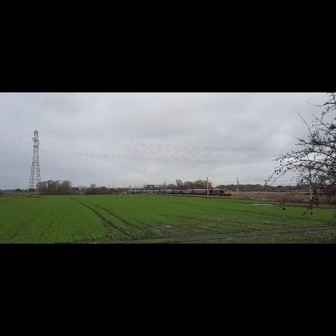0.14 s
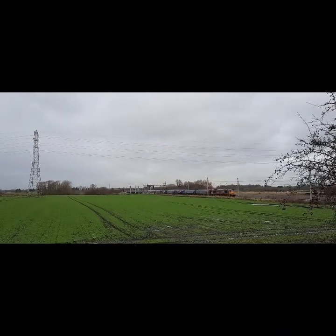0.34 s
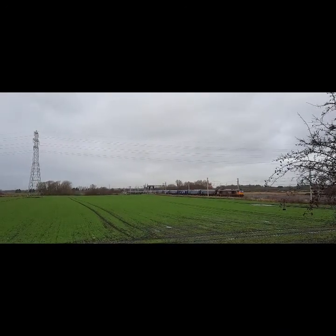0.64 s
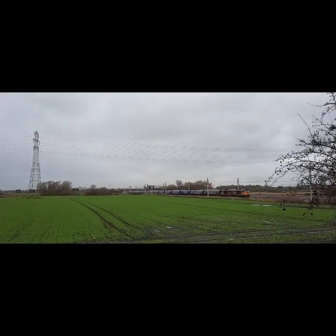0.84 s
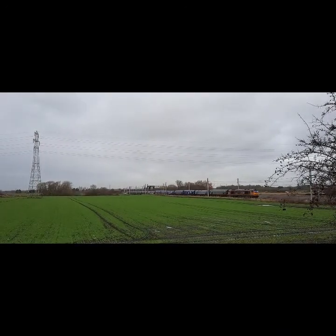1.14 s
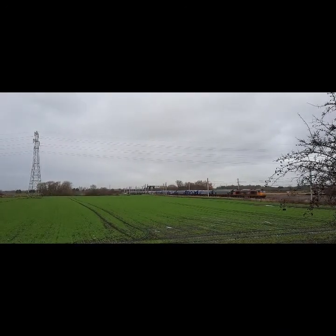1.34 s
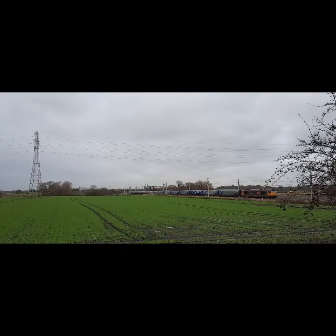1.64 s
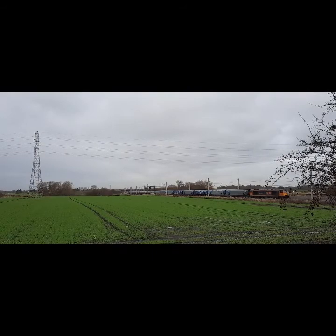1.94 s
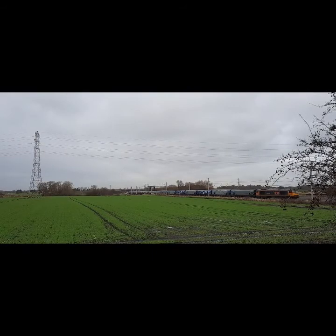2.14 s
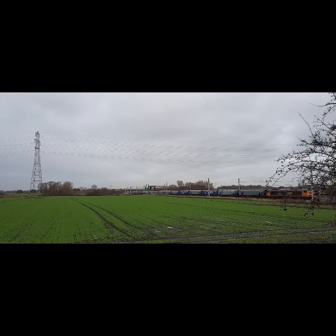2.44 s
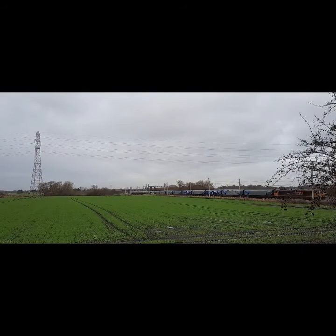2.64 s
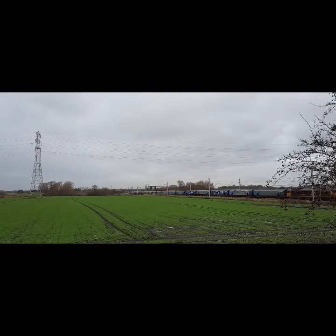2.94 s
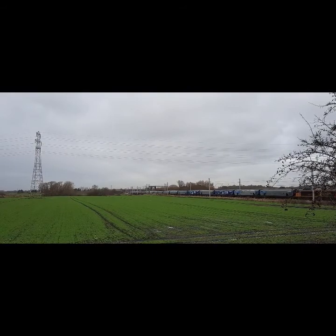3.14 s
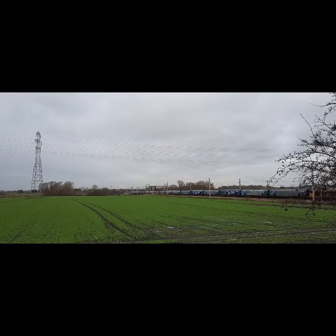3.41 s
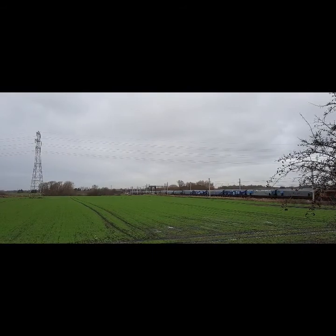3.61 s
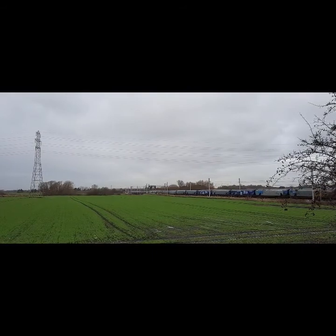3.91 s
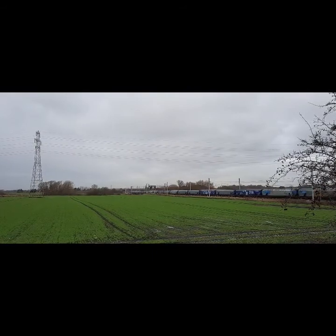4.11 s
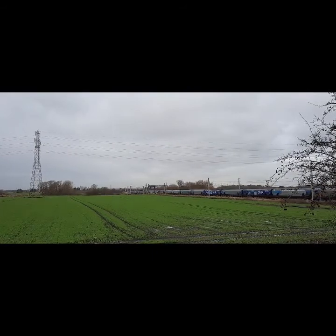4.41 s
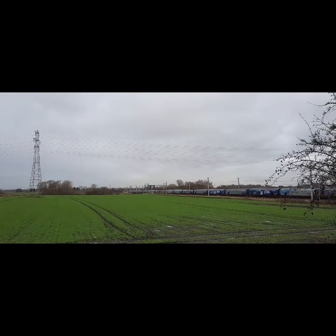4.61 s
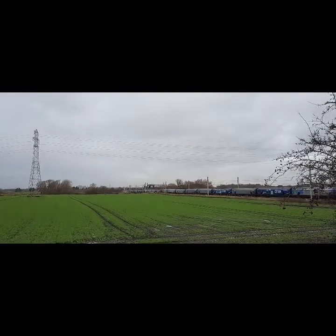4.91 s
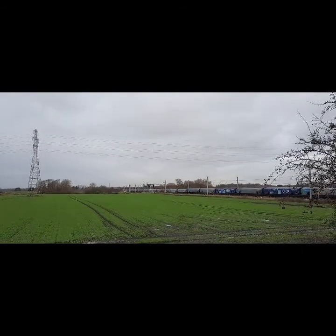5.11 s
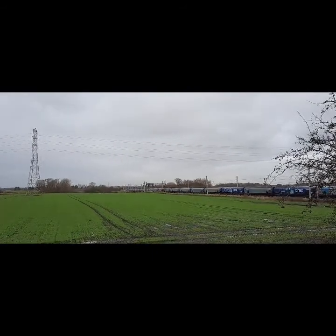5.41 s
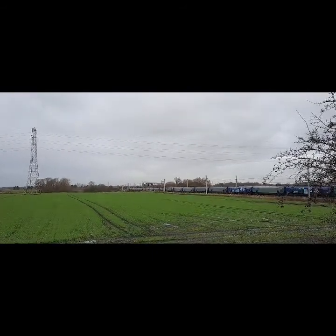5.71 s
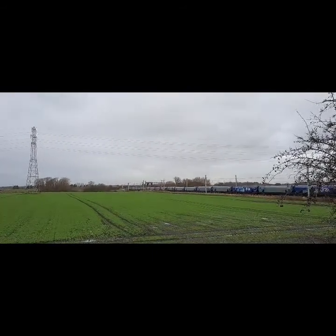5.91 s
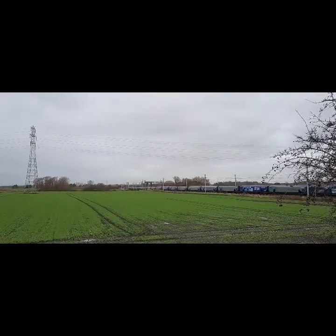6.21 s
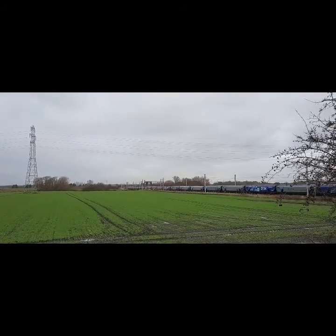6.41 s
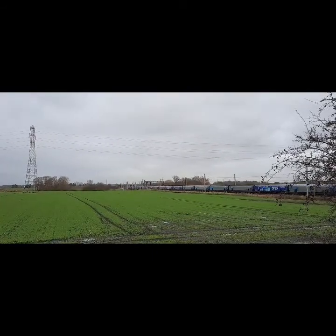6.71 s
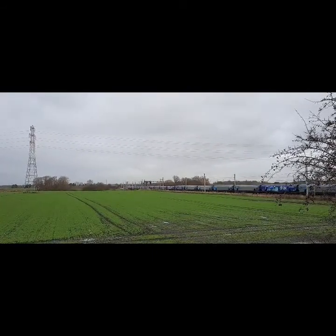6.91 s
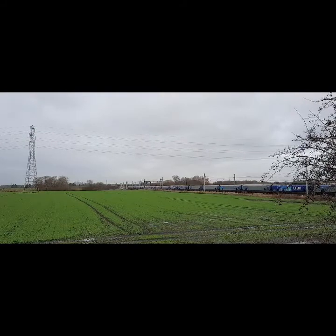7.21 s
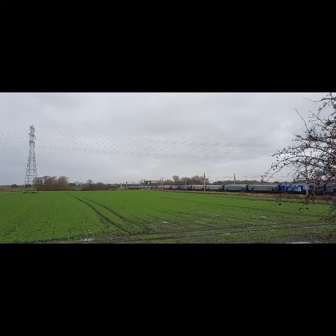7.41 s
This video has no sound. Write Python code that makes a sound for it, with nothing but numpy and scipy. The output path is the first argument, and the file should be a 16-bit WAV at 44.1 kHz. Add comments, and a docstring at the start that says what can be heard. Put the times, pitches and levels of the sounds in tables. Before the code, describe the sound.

A diesel freight train passes at a moderate distance across an open field, heard by a fixed stereo microphone outdoors. From the start a deep engine boom throbs steadily about eight times a second over low rumble, with a mid-low hum and a wavering fan tone near 300 Hz. Wheel roar, rail ring and airy hiss swell together, strongest around 3 to 5.5 seconds. Faint metallic squeals near 1.9 kHz rise around 1 to 2.5 seconds; from about 4.2 to 6.3 seconds a thin wheel tone near 2.5 kHz sings unsteadily, leaning left, with a brief higher squeal near 4.6. The engine's pitch slides down slightly throughout. After 5.9 seconds engine and roar fall away, quietest around 6.85, with tiny dull coupling clanks at 6.4 to 6.8. Wagons roll on softly and the low throb recovers a little until the end at 7.5.

```python
"""Diesel freight train beyond a field

A two-stroke engine throbs about eight times a second and sinks in pitch by the Doppler shift: harmonics
of the shaft speed sum to its boom, hum and drone, and a wavering tone gives its cooler fans.
Shaped noise gives the rumble, wheel roar, rail ring and hiss; narrow resonances make wheels sing faintly,
and short bursts of narrow noise are coupling knocks. A two-port microphone sets the stereo image."""
import sys
import numpy as np
from scipy import signal
from scipy.fft import rfft, irfft
from scipy.io import wavfile
from scipy.ndimage import uniform_filter1d

SR = 44100
rng = np.random.default_rng(int(sys.argv[2]) if len(sys.argv) > 2 else 0)


def digitize_waveform(pressure):
    """Quantize a signal to 16-bit integers and store it at the path in sys.argv[1].

    Rows of a 2-D input are taken as channels; values are limited to [-1, 1].
    """
    field = np.atleast_2d(pressure).T
    bounded = np.clip(field, -1, 1)
    quanta = np.round(bounded * 32767).astype(np.int16)
    wavfile.write(sys.argv[1], SR, quanta)


N = 332955
TIME = np.arange(N) / SR  # s
WINDOW, HOP = 4096, 1024  # short-time spectra, samples
BINS = np.fft.rfftfreq(WINDOW, 1 / SR)  # Hz
FRAMES = np.arange(N // HOP + 3) * HOP / SR  # s

# nearness of the locomotive, which the rumble, rolling noises and steady fan tone follow in their own
# proportions: t/s, nearness/dB
NEARNESS = [(0, -8), (.8, -5.5), (2.3, -2), (3.8, 0.5), (5.5, -1), (6.3, -5.5), (6.85, -7.5), (7.55, -4.5)]


def gain_of(db):
    """Logarithmic level: 20 dB is a factor of ten in amplitude."""
    return 10 ** (np.asarray(db) / 20)


def evened(x):
    """Normalization: scales a signal to an rms of one."""
    return x / np.sqrt(np.mean(x ** 2) + 1e-20)


def curves(rows, t=TIME):
    """Linear interpolation in time of each column of a table."""
    s, *columns = np.transpose(rows)
    return [np.interp(t, s, column) for column in columns]


def spectra(rows):
    """Linear interpolation over log frequency of each column of a table."""
    hz, *columns = np.transpose(rows)
    return [np.interp(np.log(BINS + 1), np.log(hz + 1), column) for column in columns]


def bell(t, s, length):
    """Gaussian envelope of height one, centred on s with standard deviation length."""
    return np.exp(-((t - s) / length) ** 2 / 2)


def changeover(s, length, db):
    """Sigmoid transition: a smooth step of db around time s."""
    return db * (1 + np.tanh((TIME - s) / length)) / 2


def drift(rate):
    """Low-passed random process of rms one, changing about `rate` times a second."""
    hz = np.fft.rfftfreq(N, 1 / SR)
    lowpass = np.exp(-(hz / rate) ** 2)
    return evened(irfft(rfft(rng.standard_normal(N)) * lowpass, N))


def narrow(hz, width_hz):
    """Quadrature modulation: slow noise on two carriers makes a narrow band of noise at hz."""
    angle = 2 * np.pi * np.cumsum(hz * np.ones(N)) / SR
    return evened(drift(width_hz) * np.cos(angle) + drift(width_hz) * np.sin(angle))


def wavering(hz, wander_hz, rate):
    """Frequency modulation: a tone of rms one whose pitch wanders randomly about hz."""
    return np.sqrt(2) * np.cos(2 * np.pi * np.cumsum(hz + wander_hz * drift(rate)) / SR)


def panned(x, balance_db):
    """Level difference between the ports: the left is louder by balance_db."""
    gains = gain_of([[balance_db / 2], [-balance_db / 2]])
    return x * gains / gains.mean()


def ports():
    """Interaural-style cues: each port's gain and their complex coherence, by time and frequency."""
    # direction of the noise: t/s, share from the side (0-1), lag of the left port for sound ahead/ms
    bearing = [(0, 0, -0.013), (1.2, 0.15, -0.02), (2.4, 0.35, 0.066), (3.5, 0.67, 0.12), (4.6, 0.82, 0.28),
               (7.55, 0.87, 0.13)]
    # colour of the ports: f/Hz, then left level/dB and right level/dB for ahead, abreast and away
    port_gains = [(60, 4, -1, 4.5, -2.5, 2.5, -2), (248, 2, -0.5, 3.0, -0.5, 2.5, -1),
                  (427, 5.0, -3.5, 6, -3.5, 3.5, -7.5), (520, 1.5, -9, 0, -10, 1.5, -6.5),
                  (674, 3, -0.5, 0.5, -4, 3.5, 2.5), (816, 3.5, 5, 2, 5, 5.5, 3.5),
                  (990, 6, 3.5, 3.5, 1, 6.5, -3), (1200, 6, 3.5, 3, -0.5, 7, -5.5),
                  (1430, 5.5, 0.5, 2.0, -11.5, 5.5, -7.5), (1556, 2, -12.5, -0.5, -12.5, 2, -7.5),
                  (1665, -2.5, -8.5, -1, -1.5, -1.5, -5.5), (1904, 6.5, 5.5, 9, 6, 7.5, 1.5),
                  (2120, 4, 3.5, 10, 2.5, 8.5, 2.5), (2290, -2.5, -12, 2, -1.5, 3, -2.5),
                  (2460, 0, 2.5, 3.5, -8.5, 7, -1.0), (2510, 7, 0.5, 3.5, 5.5, 0, 2.5),
                  (2866, 1, 4.5, 1.5, 0.5, 3, 0), (3240, -3.5, -7, -0.5, -13.0, -1.5, -6.5),
                  (3350, -4.5, -7, -2, -5, -3, -5), (3480, 2, 2, -3, 3, -3, 0.0),
                  (3730, 9, 0.5, 1.5, 0, 1, -4), (4160, -2, -4.5, 2.5, -11, -1, -2.5),
                  (4410, 1, 5, -4, 5, -2.0, 2), (4760, -5, -5.0, 1.5, -4, 1.5, -4.5),
                  (5150, 0.5, 4, 1.5, 3, -1.5, 4.5), (5470, 3, 3.5, 0, 2.5, -1.0, 5.5),
                  (5830, -6.0, 1, 2, -3.5, 4.5, 4), (6200, 1.5, 5.0, 0, 5, -0.5, 5),
                  (6660, -3, -4.5, 1, 1.5, -0.5, 1.5), (7160, -4, -5, 3.5, 2, -2, -3),
                  (7900, -8.5, -28.5, -2.5, -6.5, -2, -5)]
    # relation of the ports: f/Hz, left's lead/rad and likeness (0-1, before the exponent below) for a
    # train ahead, then the same two for a train to the side
    port_phases = [(60.0, 0.1, 1.0, 0.0, 0.99), (250.0, 0.1, 0.98, 0.0, 0.98),
                   (420.0, 0.4, 0.89, 0.1, 0.77), (520.0, -0.3, 0.66, -1.3, 0.47),
                   (750.0, -0.3, 0.83, -0.8, 0.8), (1050.0, 0.4, 0.9, -0.7, 0.53),
                   (1300.0, 0.9, 0.88, -1.5, 0.36), (1500.0, 1.7, 0.68, -3.6, 0.77),
                   (1680.0, 4.1, 0.72, -2.5, 0.57), (1950.0, 5.9, 0.96, 0.3, 0.46),
                   (2130.0, 6.8, 0.81, 1.8, 0.43), (2330.0, 3.8, 0.56, 4.8, 0.11),
                   (2650.0, 5.7, 0.78, 5.0, 0.32), (2900.0, 6.3, 0.85, 6.6, 0.39),
                   (3150.0, 7.3, 0.62, 9.0, 0.31), (3500.0, 6.3, 0.46, 11.5, 0.38),
                   (3850.0, 7.1, 0.7, 11.4, 0.3), (4100.0, 10.0, 0.44, 13.4, 0.21),
                   (4400.0, 12.2, 0.72, 10.9, 0.28), (4720.0, 9.5, 0.32, 12.9, 0.53),
                   (5120.0, 11.9, 0.59, 15.6, 0.51), (5650.0, 10.8, 0.57, 16.3, 0.47),
                   (6200.0, 7.7, 0.31, 17.7, 0.19), (6650.0, 6.8, 0.47, 20.1, 0.06),
                   (7150.0, 7.9, 0.25, 18.8, 0.26), (7900.0, 9.0, 0.13, 19.4, 0.13)]
    ahead, abreast, away = .05, .5, .85  # share from the side

    side, lag_ms = (column[:, None] for column in curves(bearing, FRAMES))
    side = np.clip(side, 0, 1)
    shares = [np.interp(side, [ahead, abreast, away], corner) for corner in np.eye(3)]
    colours = np.reshape(spectra(port_gains), (3, 2, 1, -1))
    gains = gain_of(sum(share * colour for share, colour in zip(shares, colours)))

    lead_ahead, like_ahead, lead_side, like_side = spectra(port_phases)
    swing = 2 * np.pi * BINS * lag_ms / 1000
    # phases are blended as phasors, so that they wrap correctly
    phasor = (1 - side) * np.exp(1j * (lead_ahead - swing)) + side * np.exp(1j * lead_side)
    lead = np.angle(phasor)
    likeness = np.clip((1 - side) * like_ahead + side * like_side, 0, 1) ** .6
    return gains, likeness * np.exp(-1j * lead)


def noise(spectrum, microphone, patchy_db, lift_db=0):
    """Filtered noise with partial coherence between ports; moving air makes patches swell and fade."""
    gains, same = microphone
    a, b, c, d, patches = rng.standard_normal((5, len(FRAMES), len(BINS)))
    patches = uniform_filter1d(patches, size=9, axis=0)
    patches = evened(uniform_filter1d(patches, size=8, axis=1))
    left = a + 1j * b
    independent = np.sqrt(np.maximum(1 - abs(same) ** 2, 0)) * (c + 1j * d)
    z = np.array([left, same * left + independent])
    z *= gains * gain_of(spectra(spectrum)[0] + patchy_db * patches + lift_db)
    x = signal.istft(z.transpose(0, 2, 1), nperseg=WINDOW, noverlap=WINDOW - HOP)[1][:, :N]
    # the mean of the ports is held near an rms of one over each second
    return x / np.sqrt(uniform_filter1d(x.mean(0) ** 2, size=SR))


def knocks():
    """Impact excitation: wagon couplings clank dully, far off, and decay exponentially."""
    # t/s, level/dB, centre f/Hz
    clanks = [(6.412, -37, 1000), (6.635, -40, 1000), (6.755, -40, 850)]
    attack_s, decay_s = 0.0015, 0.025
    out = np.zeros(N)
    for s, db, hz in clanks:
        age = np.maximum(TIME - s, 0)
        envelope = (1 - np.exp(-age / attack_s)) * np.exp(-age / decay_s)
        out += gain_of(db) * envelope * narrow(hz, width_hz=560)
    return panned(out, balance_db=7)


def ringing(hz, width_hz):
    """Resonance under random forcing: noise with a sharp peak and wide skirts."""
    off = (np.fft.rfftfreq(N, 1 / SR) - hz) / width_hz
    random_phase = np.exp(2j * np.pi * rng.random(len(off)))
    return evened(irfft(random_phase / (1 + off ** 2) ** .75, N))


def resonance(hz, width_hz, wander):
    """Modal vibration: one resonance, part wandering tone and part rasp."""
    rasp_hz = 42  # a resonance wider than this rasps more than it sings
    pitch = hz + width_hz / 2 * np.roll(wander, rng.integers(N))
    tone = np.sqrt(2) * np.cos(2 * np.pi * np.cumsum(pitch) / SR)
    clean = 1 / (1 + (width_hz / rasp_hz) ** 2)  # tone's share of the power
    return np.sqrt(clean) * tone + np.sqrt(1 - clean) * ringing(hz, width_hz)


def squeals():
    """Modal resonance: one wheel sings on, while other squeals and swells of hiss rise and die away."""
    # long rubs, short bursts and swells of hiss: peak t/s, standard deviation/s, f/Hz, width/Hz,
    # level/dB, left-right/dB
    rises = [(1.15, .85, 1915, 12, -52, 0), (1.35, .07, 1920, 14, -52, 0), (2, .11, 1920, 20, -44.5, 0),
             (2.37, .12, 1920, 20, -45.5, 0), (3.25, .12, 1925, 35, -53, 0), (4.4, .25, 1890, 16, -58, 10),
             (5.13, .2, 1872, 20, -50, 8), (1, .9, 940, 14, -51, 2), (.55, .25, 2560, 22, -53, 5),
             (1.15, .35, 2580, 20, -56, 5), (2.17, .13, 2570, 16, -52, 5), (4.12, .04, 2510, 22, -56, 4),
             (5.3, .45, 2520, 90, -56, 8), (2.5, .6, 3700, 120, -52.5, 3), (2.4, .5, 3520, 30, -59, 0),
             (3.4, .45, 3470, 100, -57, -10), (3.1, .5, 5100, 100, -61, 0),
             (4.58, .19, 3540, 130, -51.5, -2), (4.55, .045, 3453, 12, -48, -2),
             (4.68, .06, 3550, 24, -55, -2), (5.3, .45, 3500, 90, -61, -2)]
    # the one wheel that sings on and on: t/s, level/dB
    song = [(4.2, -66), (4.32, -50), (4.45, -49), (4.53, -46), (4.62, -50.5), (4.78, -49), (4.95, -47.5),
            (5.05, -52.5), (5.3, -49.5), (5.43, -53), (5.52, -47.5), (5.74, -47.5), (5.8, -55), (6.18, -56),
            (6.35, -70)]
    wander = drift(30)
    song_db = np.interp(TIME, *np.transpose(song), left=-120, right=-120)
    singing = gain_of(song_db) * resonance(2501, 20, wander)  # pitch Hz, width Hz
    out = panned(singing, balance_db=7.5)
    for s, length, hz, width_hz, db, balance_db in rises:
        rise = gain_of(db) * bell(TIME, s, length) * resonance(hz, width_hz, wander)
        out += panned(rise, balance_db)
    flutter_db = 2 * drift(28)
    return out * gain_of(flutter_db)


def roar(near_db, microphone):
    """Roughness excitation: rough steel on steel makes the wheels roar, with broad humps as it swells."""
    # f/Hz, relative level/dB per Hz
    spectrum = [(200, -26.5), (330, -4), (430, 0.5), (560, 1.5), (750, -1.5), (1000, -1.5), (1300, -4.5),
                (1600, -5), (2100, -47.5)]
    # swells of the roar: t/s, standard deviation/s, centre f/Hz, height/dB
    humps = [(2.1, 0.24, 890, 5.5), (2.85, 0.28, 880, 3), (3.996, 0.39, 1103, 5.5), (4.9, 0.21, 1134, 4),
             (5.496, 0.43, 830, 5), (7.2, .5, 400, 4.5)]
    # the wagons roll more quietly than the locomotive: changeover t/s, its length/s, level change/dB
    drop = (5.88, 0.23, -4.5)
    hump_db = sum(db * bell(FRAMES[:, None], s, length) * np.exp(-(np.log((BINS + 1) / hz) / 0.33) ** 2)
                  for s, length, hz, db in humps)
    level_db = -35 + 0.39 * near_db + changeover(*drop)
    return gain_of(level_db) * noise(spectrum, microphone, patchy_db=1.4, lift_db=hump_db)


def rail_ring(near_db, microphone):
    """Forced vibration: the rails ring in a band of noise above the roar."""
    # f/Hz, relative level/dB per Hz
    spectrum = [(1200, -28.5), (1650, 4), (2000, 0), (2500, -0.5), (3000, -3), (3800, -33)]
    # the ring of the rails drops in level: time t/s, its length/s, level change/dB
    drop = (3.17, 0.19, -2.4)
    level_db = -43 + 0.31 * near_db + changeover(*drop)
    return gain_of(level_db) * noise(spectrum, microphone, patchy_db=1.73)


def hiss(near_db, microphone):
    """Contact noise: the patches where wheel meets rail hiss in the treble."""
    # f/Hz, relative level/dB per Hz
    spectrum = [(2300, -24.5), (3200, 4), (3700, 0), (4500, -4), (5200, -5.5), (5800, -14.5), (6600, -27.5)]
    return gain_of(-48.5 + 0.52 * near_db) * noise(spectrum, microphone, patchy_db=2.0)


def fizz(near_db, microphone):
    """Atmospheric absorption: the air takes more of the top fizz the farther off the train is."""
    # f/Hz, relative level/dB per Hz
    spectrum = [(4800, -21), (5800, -1.5), (6300, -3.5), (7000, -2.5), (7900, -5), (8600, -19.5)]
    # the train's front draws level at abreast_s; from then on there are wheels at the closest point
    abreast_s, track_m, speed_m_per_s = 2.95, 49, 51
    air_db_per_m = 0.04
    along_m = speed_m_per_s * np.maximum(abreast_s - TIME, 0)
    extra_m = np.hypot(track_m, along_m) - track_m
    level_db = -58.5 + 0.27 * near_db - air_db_per_m * extra_m + 0.88 * drift(3)
    return gain_of(level_db) * noise(spectrum, microphone, patchy_db=3.0)


def rolling(near_db, microphone):
    """Superposition of the wheel and rail noises under one shared flicker of level."""
    # swells and dips of the hiss and fizz: t/s, standard deviation/s, level change/dB
    swells = [(1, 0.25, 2.5), (3.45, 0.22, 0.5), (5.35, 0.44, -1.4)]
    swell_db = sum(db * bell(TIME, s, length) for s, length, db in swells)
    treble = gain_of(swell_db) * (hiss(near_db, microphone) + fizz(near_db, microphone))
    flicker = gain_of(0.45 * drift(22))
    return flicker * (roar(near_db, microphone) + rail_ring(near_db, microphone) + treble)


def fans(near_db):
    """Power summation: surges of the cooler fans' tone add to its steady level as the pitch glides."""
    # peak t/s, standard deviation of the amplitude/s, f/Hz, level/dB
    surges = [(.06, .05, 299, -39), (1.07, .06, 297, -39.5), (1.4, .08, 300, -40), (1.73, .05, 296, -34),
              (1.88, .05, 299, -36), (2.12, .04, 297, -37.5), (2.46, .045, 294, -34),
              (2.67, .045, 294, -32.5), (2.77, .04, 289, -31), (2.86, .03, 295, -34),
              (3.02, .04, 300, -33.5), (3.2, .05, 297, -33.5), (3.41, .06, 298, -33), (3.71, .06, 294, -34),
              (4, .04, 294.5, -33.5), (4.28, .045, 295, -34.5), (4.6, .05, 292, -38), (4.86, .05, 296, -31),
              (5.12, .045, 290, -32.5), (5.28, .04, 293, -34), (5.41, .035, 289, -33),
              (5.65, .04, 293, -37), (5.85, .06, 292, -30.5), (6.55, .05, 289, -40),
              (6.82, .06, 298, -41.5), (7.3, .15, 296, -42)]
    hz, = curves([(s, pitch) for s, _, pitch, _ in surges])
    surge_power = sum((gain_of(db) * bell(TIME, s, length)) ** 2 for s, length, _, db in surges)
    steady = gain_of(-45.5 + 0.43 * near_db)
    level = np.sqrt(steady ** 2 + surge_power)
    return level * gain_of(0.5 * drift(12)) * wavering(hz, wander_hz=1.5, rate=15)


def rumble(near_db, turns, microphone):
    """Amplitude modulation: low noise that pulses once a turn of the shaft."""
    # f/Hz, relative level/dB per Hz
    spectrum = [(10, -23.5), (28, -25.5), (42, -17.5), (55, 0.5), (85, 0), (135, 3), (175, -0.5), (225, -7),
                (270, -2.5), (345, -1.5), (430, -13.5), (520, -17), (800, -57.5)]
    pulsing = gain_of(.7 * np.cos(2 * np.pi * turns))
    return gain_of(-28 + 0.82 * near_db) * pulsing * noise(spectrum, microphone, patchy_db=0.67)


def exhaust_lines(lines, turns, waver_db):
    """Beats and phase dispersion: lines beat into throbs, which the silencer makes build slowly and drop fast."""
    smear = .51  # how much the silencer delays the lines away from its resonance
    out = np.zeros(N)
    for k, db in lines:
        order = round(2 * k) / 2
        delay = smear * (round(k) - 7) * (round(k) - 7.5) * (round(k) - 8)  # zero for orders 7 and 8
        out += gain_of(db + waver_db * drift(2)) * np.cos(2 * np.pi * order * turns - delay)
    return evened(out)


def exhaust(turns):
    """Harmonic synthesis: orders 7 and 8 beat once a turn; a hum an octave up and a drone lie above."""
    # lines of each part: multiple of the shaft speed, relative level/dB
    boom_lines = [(5, -28), (6, -18.5), (7, -3), (8, -4.3), (9, -16.5)]
    hum_lines = [(11, -23.5), (12, -11), (13, -6), (14, -15.5), (15, 3.5), (16, -13)]
    drone_lines = [(18.5, 0), (21, -11), (23, -13), (25, -11)]
    # t/s, boom level/dB, hum level/dB (both before the trims below)
    loudness = [(0, -28, -28.5), (.55, -28, -26.8), (1.3, -26.7, -25.8), (1.7, -26.3, -27.3),
                (2.35, -26, -25.3), (3.1, -26.3, -25), (3.6, -26.3, -27), (4.3, -25.8, -27.3),
                (4.9, -26.3, -25), (5.25, -25.5, -24.5), (5.5, -26, -29), (5.85, -24.8, -30.5),
                (6.2, -29, -33.5), (6.5, -34.5, -37), (6.85, -39, -46), (7.2, -33, -33), (7.55, -30.5, -34)]
    # the drone, strongest while the engine is still ahead: t/s, level/dB
    drone_level = [(0, -40.5), (.3, -34), (.8, -37), (1.2, -40.5), (2.4, -39.5), (3.5, -38), (4.5, -42),
                   (5.8, -41), (6.7, -48), (7.55, -48)]
    boom_db, hum_db = curves(loudness)
    drone_db, = curves(drone_level)
    boom = gain_of(boom_db - 1.2) * exhaust_lines(boom_lines, turns, waver_db=.3)
    hum = gain_of(hum_db - 1.9 + .8 * drift(23)) * exhaust_lines(hum_lines, turns, waver_db=.4)
    drone = gain_of(drone_db) * exhaust_lines(drone_lines, turns, waver_db=1.5)
    return boom + hum + drone


def locomotive(near_db, microphone):
    """Doppler shift: the shaft speed as heard falls, taking the exhaust and the rumble's pulse with it."""
    # crankshaft as heard: t/s, speed/turns per second
    shaft = [(0, 8.15), (.4, 8.11), (1.15, 8.1), (2.65, 8.04), (3.4, 8), (4.15, 7.95), (4.9, 7.88),
             (5.65, 7.78), (6.4, 7.71), (7.3, 7.62)]
    first_throb_turns = .380  # turns before the first throb
    speed, = curves(shaft)
    turns = np.cumsum(speed) / SR - first_throb_turns
    tonal = panned(exhaust(turns) + fans(near_db), balance_db=4.5)
    return tonal + rumble(near_db, turns, microphone)


def scene():
    """Superposition: the locomotive leading its wagons."""
    microphone = ports()
    near_db, = curves(NEARNESS)
    wagons = knocks() + squeals() + rolling(near_db, microphone)
    return wagons + locomotive(near_db, microphone)


def record(dry):
    """Band limitation: a linear-phase low-pass at the microphone's upper edge, after a short fade-in."""
    edge_hz = 8450
    fade_in = np.minimum(TIME / .004, 1)
    lowpass = signal.firwin(511, edge_hz, window=("kaiser", 9), fs=SR)
    return signal.oaconvolve(dry * fade_in, lowpass[None], "same")


dry = scene()
out = record(dry)
digitize_waveform(out)
```